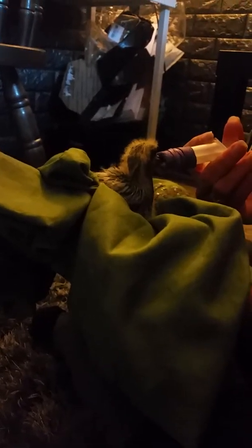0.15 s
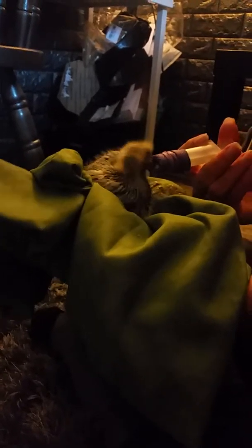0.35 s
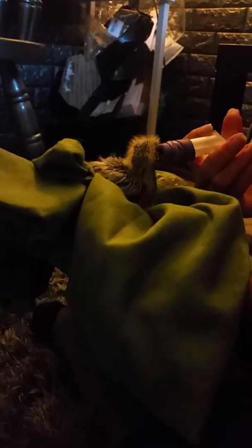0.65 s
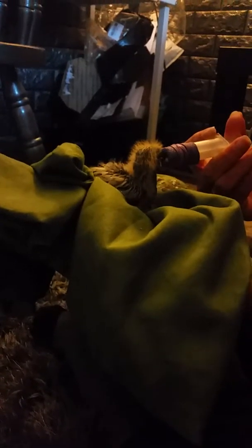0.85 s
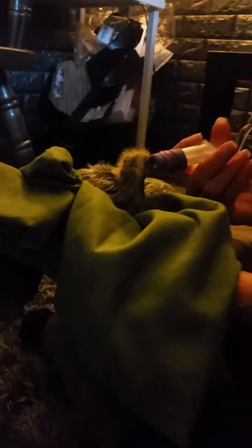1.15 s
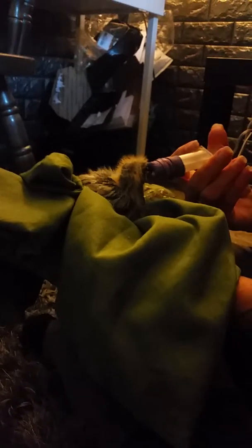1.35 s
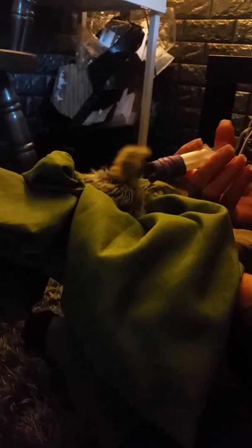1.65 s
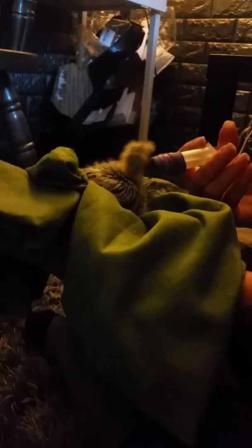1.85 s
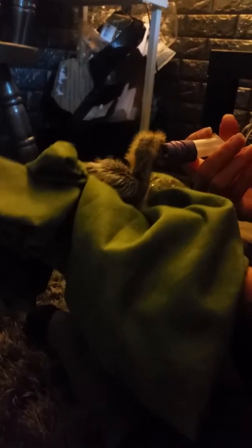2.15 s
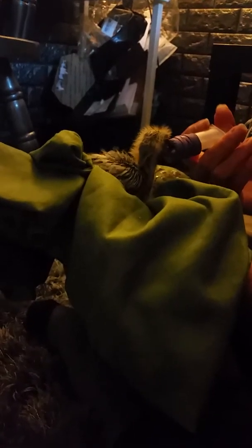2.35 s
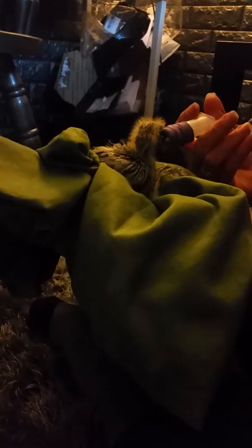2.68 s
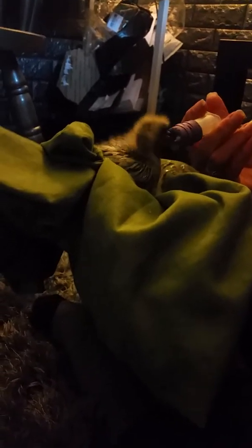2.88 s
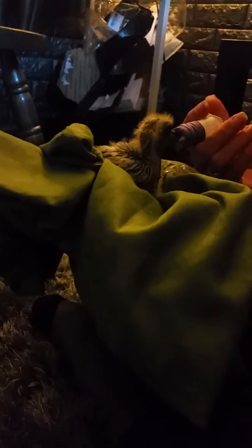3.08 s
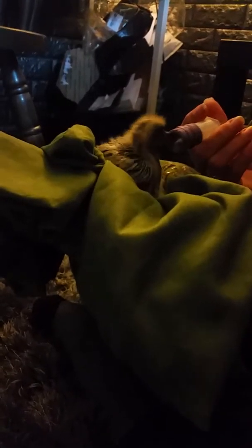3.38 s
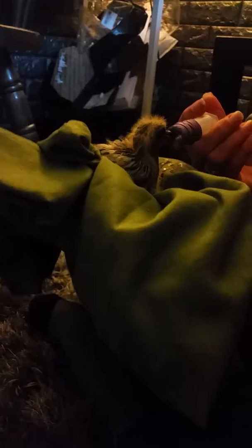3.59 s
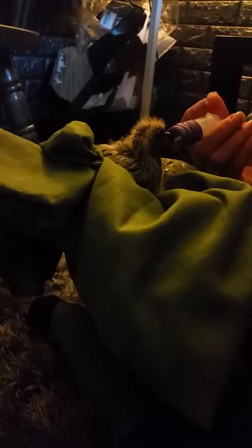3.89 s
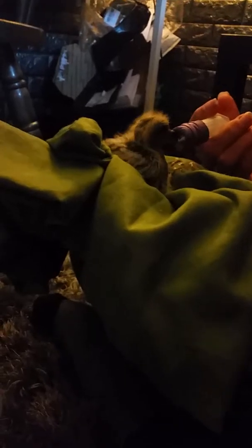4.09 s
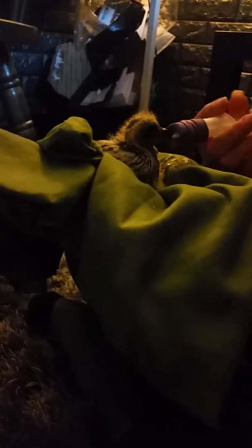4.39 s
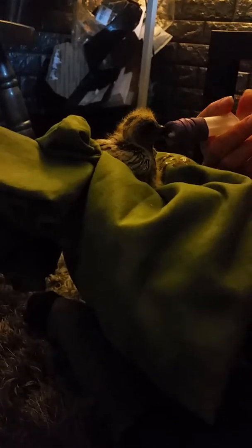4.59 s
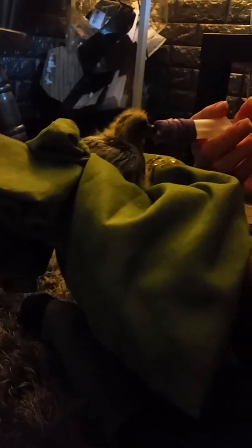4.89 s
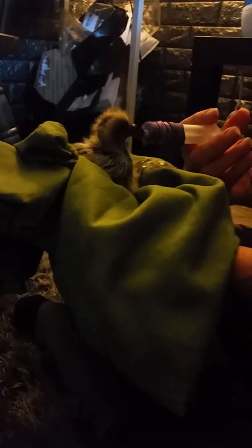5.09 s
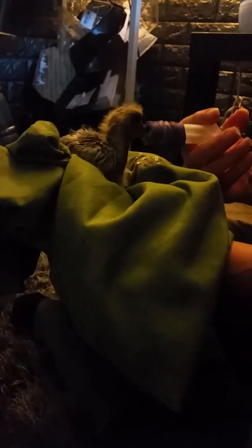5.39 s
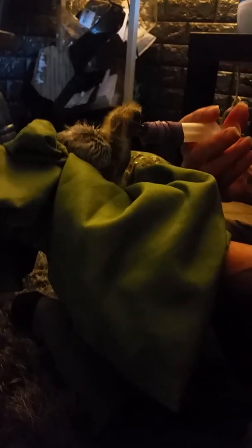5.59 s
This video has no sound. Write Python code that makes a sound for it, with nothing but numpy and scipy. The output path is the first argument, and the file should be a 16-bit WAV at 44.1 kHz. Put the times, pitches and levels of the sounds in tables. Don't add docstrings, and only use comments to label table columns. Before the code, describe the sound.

Close, high two-toned chick squeaks rise and fall about every three quarters of a second, with tiny creaks, dry ticks and faint room hum.

```python
import sys
import numpy as np
from scipy import signal
from scipy.fft import rfft, irfft, next_fast_len
from scipy.io import wavfile
from scipy.ndimage import uniform_filter1d

SR = 44100
rng = np.random.default_rng(int(sys.argv[2]) if len(sys.argv) > 2 else 0)


def boost_factor(decibels):
    exponent = np.asarray(decibels, float) / 20
    return 10 ** exponent


def waveform_to_disk(signal):
    frames = np.transpose(np.atleast_2d(signal))
    scaled = np.clip(frames, -1, 1) * 32767
    samples = np.round(scaled).astype(np.int16)
    wavfile.write(sys.argv[1], SR, samples)


N = 253198

# time in seconds, upper side in Hz, lower side in Hz, upper level in dB, lower level in dB.
FIRST_PEEP = [(0.31, 5000, 3920, -54.5, -59), (0.325, 5848, 4400, -51, -55), (0.345, 6011, 4360, -72, -63)]
FIRST_CALL = [(.385, 6510, 5116, -74, -75), (.45, 6500, 5800, -54, -43), (.52, 7300, 6300, -53, -42),
              (0.549, 6980, 6450, -40, -64), (.57, 6650, 5880, -43, -32), (0.616, 6460, 5830, -38.5, -43.5),
              (0.649, 5640, 5190, -39.5, -29.5), (0.686, 5600, 4900, -44, -35),
              (0.708, 5250, 4210, -43.5, -41.5)]
SECOND_CALL = [(1.1, 6020, 4060, -67, -55.5), (1.15, 6150, 4930, -54.5, -53.5),
               (1.245, 6650, 5040, -42.5, -40.5), (1.275, 6450, 5750, -40, -42.5),
               (1.324, 6424, 5970, -39, -36), (1.359, 5810, 5420, -34, -41.5),
               (1.389, 5860, 5164, -34.5, -34), (1.464, 5220, 5057, -40, -26.5),
               (1.496, 5280, 4454, -66, -31.5)]
THIRD_CALL = [(1.8, 5080, 4100, -63, -53), (1.825, 6000, 4480, -60, -55.5), (1.879, 6220, 4370, -63, -51),
              (1.94, 6170, 4620, -50.5, -61), (1.971, 6730, 6150, -54, -61.5),
              (2.009, 7650, 5984, -50, -36.5), (2.07, 6300, 5750, -40, -35),
              (2.111, 5940, 5200, -31, -34.5), (2.181, 5320, 4440, -44, -45.5)]
FOURTH_CALL = [(2.501, 5200, 3850, -49.5, -66), (2.54, 6290, 4610, -59, -54),
               (2.58, 6300, 4420, -50.5, -49.5), (2.615, 6720, 5720, -43, -46.5),
               (2.736, 6930, 5916, -36.5, -33.5), (2.772, 5650, 4943, -31, -36),
               (2.812, 5920, 4890, -37.5, -33.5), (2.866, 5675, 4914, -30.5, -31.5),
               (2.891, 5170, 4315, -37.5, -31)]
FIFTH_CALL = [(3.215, 5320, 4360, -66.5, -52), (3.269, 6650, 4830, -46.5, -48.5),
              (3.33, 6824, 5340, -41.5, -42), (3.38, 6380, 5510, -32, -44.5),
              (3.41, 6750, 5736, -36.5, -44), (3.44, 6720, 6150, -36, -46), (3.501, 5905, 5544, -37, -42),
              (3.581, 5970, 5650, -41, -38.5), (3.612, 4795, 4300, -50.5, -31)]
SIXTH_CALL = [(3.98, 5520, 4167, -61.5, -43.5), (4.03, 6360, 4770, -47, -50), (4.14, 7004, 5443, -36, -37),
              (4.206, 6977, 6030, -28, -44.5), (4.27, 5705, 5363, -32.5, -31),
              (4.304, 5580, 5170, -31, -33.5), (4.329, 5203, 4593, -47, -31.5),
              (4.366, 5330, 4797, -37.5, -31), (4.395, 5060, 4104, -57, -41)]
SEVENTH_CALL = [(4.757, 5594, 4226, -61, -55.5), (4.795, 6470, 4790, -52.5, -60.5),
                (4.853, 6626, 5193, -44.5, -53), (4.898, 6850, 5330, -39.5, -51),
                (4.975, 6876, 5650, -35.5, -48.5), (4.999, 6200, 5636, -46, -40),
                (5.023, 5550, 5335, -42, -44.5), (5.066, 5414, 4910, -64, -41),
                (5.123, 5243, 4205, -85, -44.5)]
LAST_PEEP = [(5.565, 7300, 4340, -84.5, -110), (5.619, 7600, 4300, -68.5, -110),
             (5.669, 7750, 4300, -91, -110), (5.735, 7900, 4330, -92, -110)]
SYRINX_CALLS = [FIRST_PEEP, FIRST_CALL, SECOND_CALL, THIRD_CALL, FOURTH_CALL,
                FIFTH_CALL, SIXTH_CALL, SEVENTH_CALL, LAST_PEEP]
CALL_EDGE_S = 0.012
SILENT_VOICE_DB = -58


def squeaks():
    octave_db, third_db, breath_db = throat()
    flutter_hz, depth, upper_rasp, lower_rasp = membranes()
    upper_side = [[(s, hz, db) for s, hz, _, db, _ in call] for call in SYRINX_CALLS]
    lower_side = [[(s, hz, db) for s, _, hz, _, db in call] for call in SYRINX_CALLS]
    upper = whistle(upper_side, wobble_hz=42, shimmer_db=2.6)
    lower = whistle(lower_side, wobble_hz=42, shimmer_db=2.6)
    high, low = roughen(upper, upper_rasp), roughen(lower, lower_rasp)

    flutter = np.exp(2j * np.pi * np.cumsum(flutter_hz + 45 * drift(40)) / SR)
    sidebands = flutter + .8 / flutter + .9 * flutter ** 2 * depth ** .5
    throb = depth * boost_factor(3 * drift(23)) * sidebands

    hiss = (upper * drift(1100) + lower * drift(1100)).real
    breath_band = signal.butter(4, [3700, 7700], "band", fs=SR, output="sos")
    breath = boost_factor(breath_db) * signal.sosfilt(breath_band, hiss)

    lean = boost_factor(1.5) * np.abs(lower / upper) ** 0.21
    a = high / np.sqrt(np.abs(upper * high)) / np.hypot(1, lean)
    b = low / np.sqrt(np.abs(lower * low)) * lean / np.hypot(1, lean)
    octave = a ** 2 + 0.43 * a * b + b ** 2
    octave = octave * (1 + 1.1 * throb + (0.25 + 0.99 * depth) * drift(1500))
    third_order = 1 + boost_factor(third_db + 15.0) * (a + b)
    overtones = boost_factor(octave_db) * np.hypot(np.abs(upper), np.abs(lower)) * octave * third_order
    intermodulation = boost_factor(-17.5) * high * a * np.conj(b)
    return (high * (1 + throb) + low * (1 + 0.3 * throb) + overtones + intermodulation).real + breath


def whistle(calls, wobble_hz, shimmer_db):
    rows = []
    for call in calls:
        first, last = call[0], call[-1]
        rows += [(first[0] - CALL_EDGE_S, first[1], -110)] + list(call) + [(last[0] + CALL_EDGE_S, last[1], -110)]
    hz, db = in_time(rows)
    hz = hz + wobble_hz * (1.5 * drift(30) + 0.45 * drift(300))
    return boost_factor(db + shimmer_db * drift(57)) * np.sqrt(2) * np.exp(2j * np.pi * np.cumsum(hz) / SR)


def roughen(tone, rasp):
    return tone * (np.sqrt(1 - rasp ** 2) + rasp * 0.36 * (drift(310) + 1j * drift(220)))


def throat():
    # octave at the start in dB, octave at the
    # end in dB, third order at top pitch in dB re the octave, breath at full voice in dB.
    throat_shapes = [(-34, -39, -30, -17), (-11, -25, -30, -21.5), (-1, -19, -26, -14.5),
                     (-57, -13, -9, -22), (-25.5, -11.5, 2, -14), (-11, -8.5, -27, -14),
                     (-7, -10, -28, -13.5), (-14.5, -8, -30, -12), (-40, -40, -34, -44)]
    third_fall_db_per_s, third_least_db = 202, -35
    full_voice_db, breath_per_db = -37, 0.5853
    rows, third_db = [], np.full(N, float(third_least_db))
    for call, (start_db, end_db, top_db, breath_db) in zip(SYRINX_CALLS, throat_shapes):
        rows += [(call[0][0], start_db, breath_db), (call[-1][0], end_db, breath_db)]
        top_s = max(call, key=lambda row: row[1])[0]
        from_top_s = np.abs(np.arange(N) / SR - top_s)
        third_db = np.maximum(third_db, top_db - third_fall_db_per_s * from_top_s)
    octave_db, breath_db = in_time(rows)
    return octave_db, third_db, breath_db + breath_per_db * (full_voice_db - voice_db())


def membranes():
    # middle in seconds, length in seconds, rate in Hz, depth from 0 to 1.
    flutter_bouts = [(.6, .1, 400, .1), (1.24, .06, 380, .3), (1.41, .14, 400, .3), (2.17, .05, 400, .3),
                     (2.7, .13, 520, .4), (2.84, .09, 420, .5), (3.28, .16, 480, .3), (3.43, .08, 490, .5),
                     (3.535, .12, 300, .58), (4.11, .16, 470, .27), (4.3, .1, 400, .2),
                     (4.765, .04, 550, .4), (4.95, .14, 480, .23)]
    # middle in seconds, length in seconds, upper rasp from 0 to 1, lower rasp from 0 to 1.
    rasp_bouts = [(.325, .05, .5, .5), (.465, .15, .3, .99), (1.2, .13, .2, .92), (1.855, .09, .65, .15),
                  (2.15, .07, .7, .6), (2.695, .1, .6, .5), (2.765, .05, .65, .65), (3.5, .16, .45, .35),
                  (4.2, .05, .1, .4), (4.3, .1, .6, .35), (4.9, .22, .3, .7), (5.04, .07, .55, .45)]
    closing_s, closing_upper, closing_lower = .04, .75, .5
    flutter_hz, = in_time([(s, hz) for s, _, hz, _ in flutter_bouts])
    depth, = bouts([(s, length, deep) for s, length, _, deep in flutter_bouts], calm=.06)
    closing = [(call[-1][0], 2 * closing_s, closing_upper, closing_lower) for call in SYRINX_CALLS[:-1]]
    upper_rasp, lower_rasp = bouts(list(rasp_bouts) + closing, calm=.13)
    return flutter_hz, depth, upper_rasp, lower_rasp


def bouts(rows, calm):
    edge_s = .02
    t, out = np.arange(N) / SR, calm
    for s, length, *values in rows:
        shape = np.clip((length / 2 - np.abs(t - s)) / edge_s + .5, 0, 1)
        out = np.maximum(out, np.outer(values, shape))
    return out


def voice_db():
    rows = []
    for call in SYRINX_CALLS:
        level = [(s, max(high_db, low_db)) for s, _, _, high_db, low_db in call]
        before, after = level[0][0] - CALL_EDGE_S, level[-1][0] + CALL_EDGE_S
        rows += [(before, SILENT_VOICE_DB)] + level + [(after, SILENT_VOICE_DB)]
    return np.maximum(in_time(rows)[0], SILENT_VOICE_DB)


def creaks():
    # start in seconds, number of pulses, spacing in ms, bright level in dB, thump level in dB.
    creak_events = [
        (0.296, 2.9, 3.2, -49, -49),
        (1.078, 5.2, 3.5, -42, -41.5),
        (1.79, 4.9, 3.1, -55, -53),
        (2.4895, 3.2, 3.9, -46, -49),
        (3.209, 3, 3.3, -48, -45),
        (3.9514, 7.1, 3.55, -36.5, -44),
        (4.733, 6.3, 3.32, -48, -45),
    ]
    # frequency in Hz, level in dB, 60 dB decay time in seconds.
    airway_modes = [(4100, 6, 0.012), (4900, -8, 0.011), (6460, -11, 0.011), (11400, -16, 0.014)]
    # frequency in Hz, level in dB, 60 dB decay time in seconds.
    crop_modes = [(330, -6, 0.011), (513, -1, 0.0054), (744, -5.5, 0.02)]
    puff_ms = 2.5
    bright, thump = np.zeros(N), np.zeros(N)
    luck = rng.standard_normal((len(creak_events), 8, 2))
    for (s, pulses, gap_ms, bright_db, thump_db), chance in zip(creak_events, luck):
        k = np.arange(int(pulses))
        at = np.round((s + (k + 0.3 * chance[k, 0]) * gap_ms / 1000) * SR).astype(int)
        swell = np.sin(np.pi * (k + 1.2) / (pulses + 1.6)) * boost_factor(3 * chance[k, 1])
        bright[at] = -swell * boost_factor(bright_db)
        thump[at] = -swell * boost_factor(thump_db)
    puff = rng.standard_normal(400) * np.exp(-np.arange(400) / (puff_ms * SR / 1000))
    bright = np.convolve(bright, puff / np.sqrt(np.sum(puff ** 2)))[:N]
    return ring(bright, airway_modes) + high_pass(ring(thump, crop_modes), hz=240)


def ticks():
    # time in seconds, knock level in dB, snap level in dB.
    contacts = [
        (0.026, -70, -51),
        (1.904, -72, -55.5),
        (3.128, -68, -56),
        (4.632, -75, -68.5),
        (5.4906, -79, -71),
        (5.5, -75, -72),
        (5.526, -54.5, -52.5),
    ]
    # frequency in Hz, level in dB, 60 dB decay time in seconds.
    tube_modes = [(1225, 21.5, 0.0098), (1685, -18, 0.008)]
    # frequency in Hz, level in dB, 60 dB decay time in seconds.
    snap_modes = [(4450, 13.5, 0.0027), (6750, 3.5, 0.0019), (12340, -12, .002)]
    s, knock_db, snap_db = np.transpose(contacts)
    at = np.round(s * SR).astype(int)
    knock, snap = np.zeros(N), np.zeros(N)
    knock[at], snap[at] = boost_factor(knock_db), -boost_factor(snap_db)
    return high_pass(ring(knock, tube_modes), hz=800) + high_pass(ring(snap, snap_modes), hz=2500)


def room(x):
    t60_s, level_db, treble_db = .19, -13.5, 6.0
    t = np.arange(SR // 2) / SR
    tail = rng.standard_normal((2, len(t))) * boost_factor(-60 * t / t60_s) * (t > .004)
    tail = tail / np.sqrt(np.sum(tail ** 2, axis=1, keepdims=True))
    treble = signal.sosfilt(signal.butter(2, 8500, "high", fs=SR, output="sos"), tail)
    tail = tail + (boost_factor(treble_db) - 1) * treble
    return boost_factor(level_db) * signal.fftconvolve(x[None], tail, axes=1)[:, :N]


def ports(x):
    # frequency in Hz, left gain in dB, right gain in dB.
    port_response = [(445, 7, 3.5), (2520, -6, -16.5), (3460, -9, -19), (4510, -2, -22), (5000, 1.5, -17.5),
                     (7200, 2.5, -41), (7920, -4, -35.5), (8860, -27, -42), (8790, -24.5, -13),
                     (11400, 1.5, 9), (11070, -14, 9.5), (12910, -3.5, 0), (13800, -9.5, -6.5),
                     (14600, -15.5, -23)]
    right_lag_ms = .305
    size = next_fast_len(N + 4096)
    hz = np.arange(size // 2 + 1) * SR / size
    lag = np.exp(-2j * np.pi * hz * right_lag_ms / 1000 * np.array([[0], [1]]))
    return irfft(rfft(x, size) * boost_factor(at_hz(port_response, hz)) * lag, size)[:, :N]


def gain_db():
    db_per_db, span_s, lag_s = 0.382, 0.4, 0.058
    mean = uniform_filter1d(voice_db() - SILENT_VOICE_DB, int(span_s * SR))
    mean = uniform_filter1d(mean, int(span_s * SR / 2))
    return db_per_db * np.interp(np.arange(N) - lag_s * SR, np.arange(N), mean)


def hum():
    # frequency in Hz, level in dB, phase in radians.
    hum_tones = [(111.87, -60, 2.2), (119.947, -57, 1.6), (223.74, -71, 0.0), (48.3, -75, 0.0),
                 (1119.1, -85, 0.0)]
    t = np.arange(N) / SR
    return sum(boost_factor(db + 0.4 * drift(20)) * np.sqrt(2) * np.sin(2 * np.pi * hz * t + phase)
               for hz, db, phase in hum_tones)


def low_air():
    # frequency in Hz, density in dB per Hz.
    low_spectrum = [(18, -53.5), (30, -11.5), (85, -12), (118, -5.5), (140, -11.5), (227, -11.5),
                    (286, -19), (420, -17), (463, -20.5), (809, -21.5), (3000, -43.5), (3900, -67),
                    (6600, -120)]
    return air(low_spectrum, level_db=-58)


def high_air():
    # frequency in Hz, density in dB per Hz.
    high_spectrum = [(1760, -42.5), (3000, -13.5), (3330, -20), (3690, -4.5), (4180, -8), (4640, -11.5),
                     (5900, -15.5), (6870, -10.5), (8570, -29.5), (10200, -22.5), (11600, -19),
                     (13900, -19), (15600, -15.5)]
    return air(high_spectrum, level_db=-73.5)


def air(spectrum, level_db):
    # frequency in Hz, width in Hz, height in dB.
    duct_peaks = [(424.4, 26, 10.5), (4370, 410, 8.5)]
    # frequency in Hz, left minus right in dB.
    balance = [(60, 0.5), (99, 1.0), (160, 1.0), (270, 0.5), (450, 7.5), (740, 8.0), (1220, 6.0),
               (2010, 4.5), (3330, 13.0), (5500, 15.5), (9080, 2.5), (15000, 0.5)]
    # frequency in Hz, left-right likeness, none at 0 or below.
    likeness = [(60, 0.8), (150, 0.84), (380, 0.36), (950, -0.0033), (2380, -1.5), (5980, -0.27),
                (15000, -0.24)]
    hz = np.arange(N // 2 + 1) * SR / N
    peaks_db = sum(db / (1 + (2 * (hz - f) / width) ** 2) for f, width, db in duct_peaks)
    shape_db = at_hz(spectrum, hz)[0] + peaks_db
    inside = hz > max(spectrum[0][0], 33)
    alike = np.clip(at_hz(likeness, hz), 0, 1)
    mid, side = rfft(rng.standard_normal((2, N)))
    both = np.sqrt(1 + alike) * mid + np.sqrt(1 - alike) * side * [[1], [-1]]
    out = irfft(both * inside * boost_factor(shape_db + at_hz(balance, hz) * [[.5], [-.5]]), N)
    return boost_factor(level_db) * out / np.std(out.mean(axis=0))


def ring(clicks, modes):
    out = 0
    for hz, db, t60 in modes:
        r, w = boost_factor(-60 / (t60 * SR)), 2 * np.pi * hz / SR
        out = out + signal.lfilter([0, boost_factor(db) * np.sin(w)], [1, -2 * r * np.cos(w), r * r], clicks + 1e-18)
    return out


def high_pass(x, hz):
    return signal.sosfilt(signal.butter(2, hz, "high", fs=SR, output="sos"), x + 1e-18)


def drift(hz):
    r = np.exp(-2 * np.pi * hz / SR)
    return rms_one(signal.lfilter([1], [1, -2 * r, r * r], rng.standard_normal(N + SR))[SR:])


def rms_one(x):
    return x / np.sqrt(np.mean(np.abs(x) ** 2))


def in_time(rows):
    s, *columns = np.transpose(rows)
    return [np.interp(np.arange(N) / SR, s, c) for c in columns]


def at_hz(points, hz):
    f, *columns = np.transpose(points)
    return np.array([np.interp(np.log(hz + 1), np.log(f), c) for c in columns])


def scene():
    lift_db = gain_db()
    bird = squeaks() + creaks() + ticks()
    low = (low_air() + boost_factor(-1.5) * hum()) * boost_factor(-2.5 + lift_db)
    high = high_air() * boost_factor(-2 + 1.4 * lift_db)
    return ports(bird + room(bird)) + low + high


def low_pass(x):
    return signal.sosfilt(signal.butter(12, 15780, fs=SR, output="sos"), x)


def record(dry):
    mix = dry - .0004
    return low_pass(mix)


dry = scene()
out = record(dry)
waveform_to_disk(out)
```